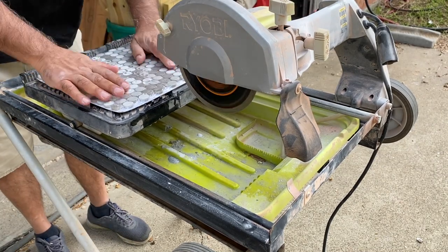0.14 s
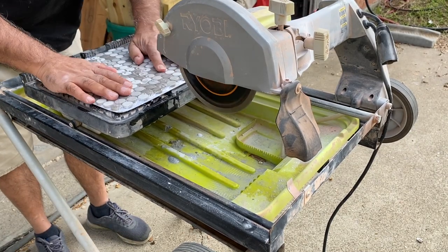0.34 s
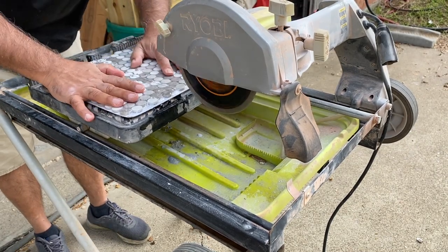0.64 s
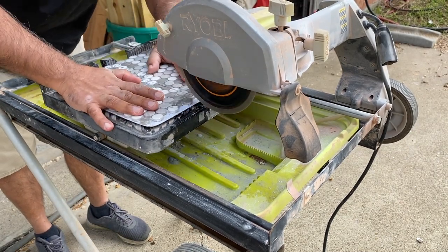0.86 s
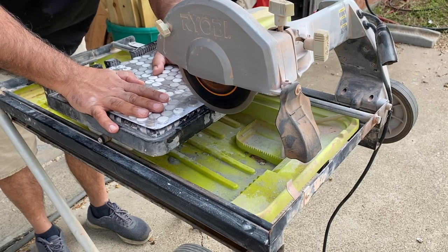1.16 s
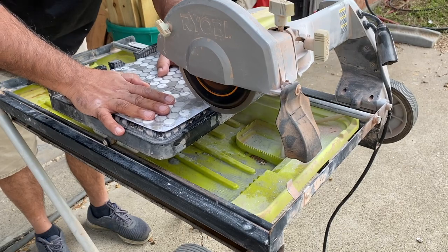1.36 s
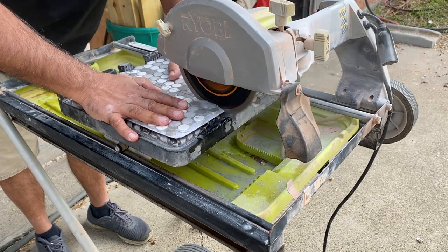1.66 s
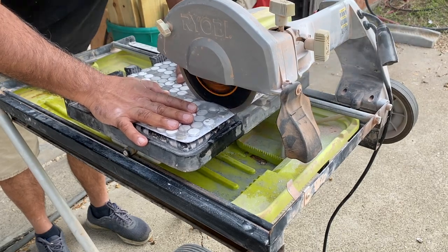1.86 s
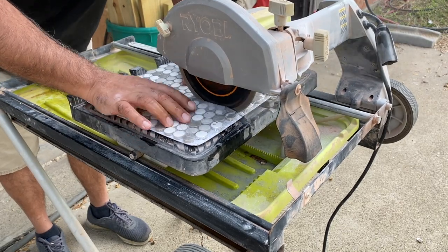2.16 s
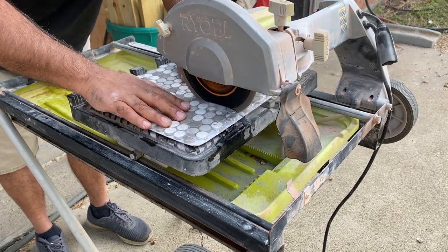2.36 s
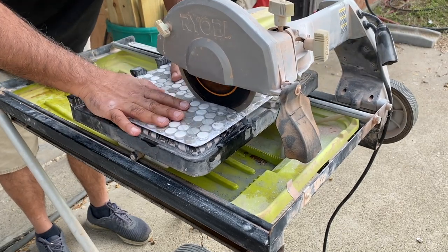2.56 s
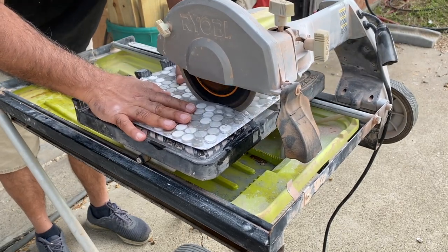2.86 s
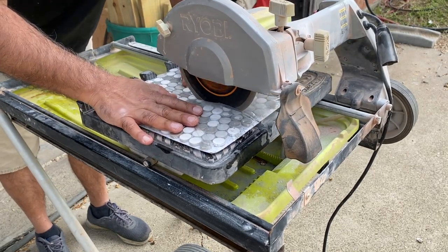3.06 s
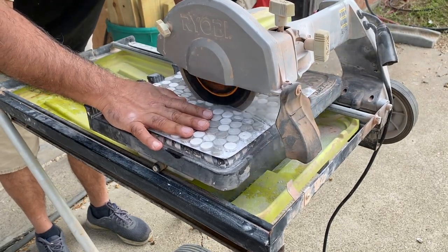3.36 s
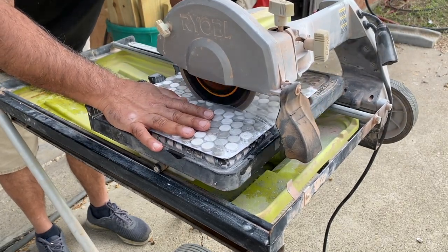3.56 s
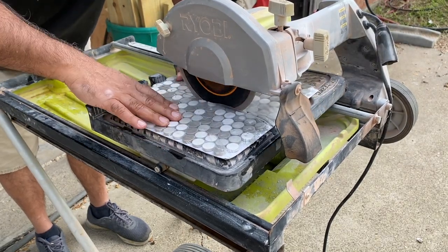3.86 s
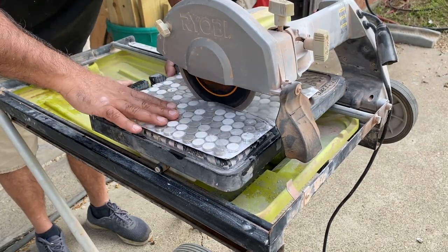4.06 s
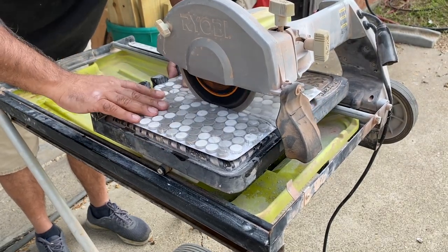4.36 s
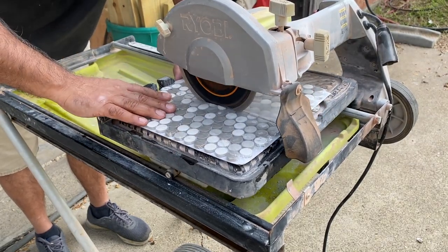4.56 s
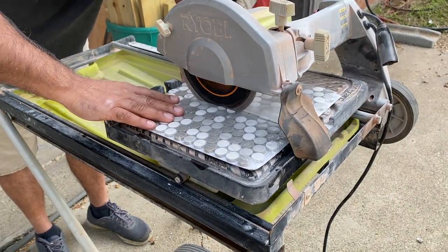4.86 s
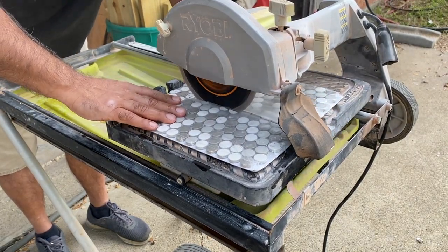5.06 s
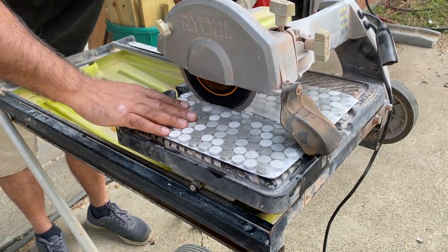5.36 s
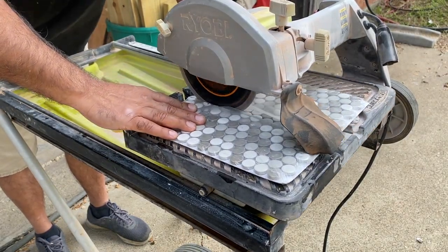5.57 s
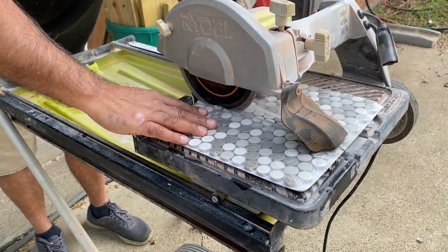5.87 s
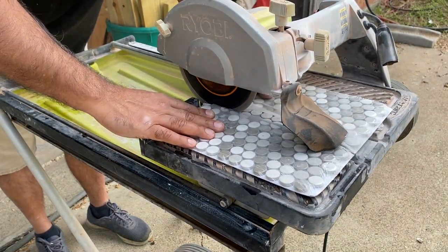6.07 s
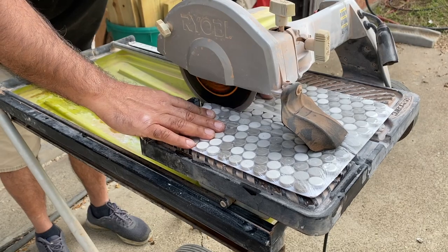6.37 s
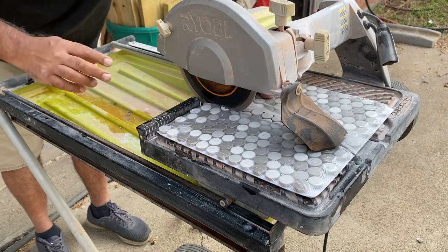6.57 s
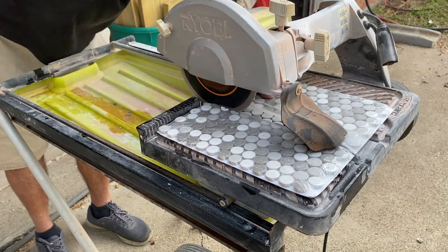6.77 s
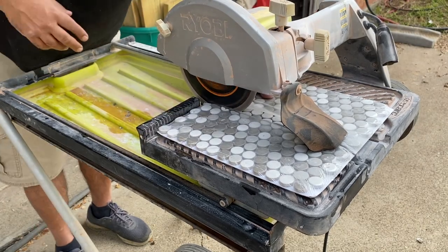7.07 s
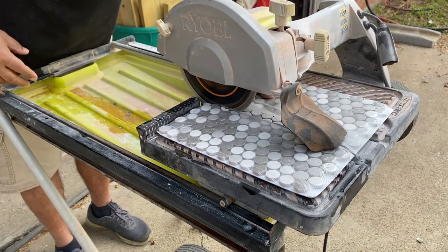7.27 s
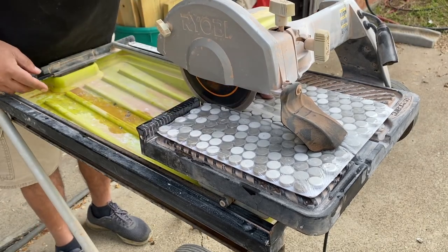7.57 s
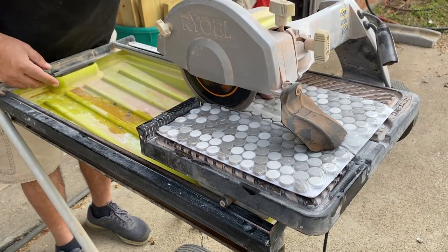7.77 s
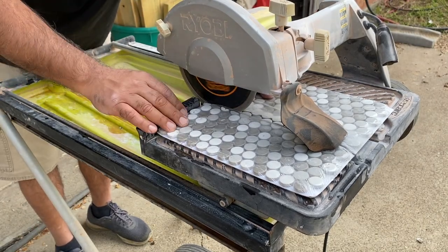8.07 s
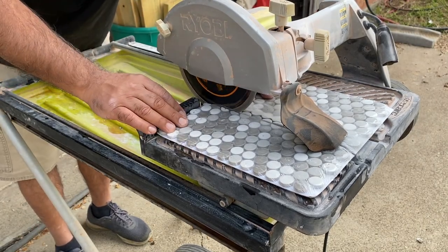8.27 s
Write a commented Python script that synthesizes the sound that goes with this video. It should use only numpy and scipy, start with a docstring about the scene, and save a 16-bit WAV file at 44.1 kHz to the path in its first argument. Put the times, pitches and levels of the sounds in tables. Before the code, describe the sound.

Close, dry stereo sound of a wet tile saw outdoors. From 0 to 1 s it spins free and loud: motor hum and whine rising slightly, rushing air, bright water spray and a ringing blade near 5 kHz. At 1 s the blade bites into mosaic tile with hissing grit and mist. Until about 6 s the grinding swells tile by tile, with short squeals around 1.3-1.8, 2.6-3.3 and 5.3-5.9 s and crushed-grit crunches from 2.6 s. The motor sags deepest near 2 s, recovers, and sags again. The tray rumbles and knocks, notably at 1.3, 2.7 and 4.4 s. After 6 s the cut clears and the whine climbs. Switched off at 6.8 s, the saw coasts down, its falling whine and spray thinning. Faint sliding whistles peak near 8 s; the pump hum continues, and soft low thuds come at 8.4 s.

```python
"""A wet tile saw runs free, grinds through a sheet of small mosaic tiles, is switched off and coasts down.
Grit noise and a pitched rasp make the grinding; driven resonances make the steel blade ring.
Sine waves tied to the rotor make the motor whine, which sags as each tile loads it.
Spray and mist are noise with tiny impacts, flung off the rim and caught by the guard.
The sliding tray rumbles and bumps on its rails, and the water pump hums underneath."""
import sys
import numpy as np
from scipy import signal
from scipy.fft import rfft, irfft, next_fast_len
from scipy.io import wavfile
from scipy.ndimage import map_coordinates

SR = 44100
rng = np.random.default_rng(int(sys.argv[2]) if len(sys.argv) > 2 else 0)


def store_pcm(level_fs):
    """Save levels as 16-bit WAV."""
    pcm = np.round(np.clip(level_fs, -1, 1) * 32767).astype(np.int16)
    wavfile.write(sys.argv[1], SR, np.atleast_2d(pcm).T)


N = 371410
T = np.arange(N) / SR  # time of each sample, s
FULL_SPEED = 383  # reference rotor speed, turns per second
BLADE_GEARING = 6.7  # rotor turns per blade turn

# how far the rim is in the tile: t/s, depth (0-1)
IN_TILE = [(.92, 0), (1.05, .85), (5.95, .88), (6.1, 0.1)]
# how squeals and crunches swell: attack/s, easing/(dB per s), time to fall 60 dB/s
FLARE_SHAPE = (.04, 2, .13)

# Every "..._law" table below holds one part's level:
# level running free/dB, extra during the loud opening/dB, fade of that extra/s,
# change at full load/dB, exponent of the load (no unit), change at standstill/dB


def amp(db):
    """Turn decibels into a gain."""
    return 10 ** (np.asarray(db) / 20)


def unit(x):
    """Scale a signal to rms 1."""
    return x / np.sqrt(np.mean(x ** 2) + 1e-20)


def along(points, hz):
    """Read a table of f/Hz, value on a logarithmic frequency axis."""
    f, value = np.transpose(points)
    return np.interp(np.log(hz + 1), np.log(f + 1), value)


def curves(rows):
    """Draw straight lines through a timed table: one curve per column after the time."""
    s, *columns = np.transpose(rows)
    return [np.interp(T, s, column) for column in columns]


def wobble(rate):
    """A smooth random curve with this many random points a second."""
    knots = rng.standard_normal(int(N * rate / SR) + 4)
    coarse = np.arange(0, N + 16, 16)  # a smooth curve needs only every 16th sample
    smooth = map_coordinates(knots, [coarse * rate / SR])
    return np.interp(np.arange(N), coarse, smooth)


def filtered(x, response):
    """Multiply the spectrum of x by a response that depends on frequency."""
    padded = next_fast_len(N + 8192)
    spectrum = rfft(x, padded) * response(np.fft.rfftfreq(padded, 1 / SR))
    return irfft(spectrum, padded)[..., :N]


def shaped(x, spectrum):
    """Filter x by a table of f/Hz, gain/dB."""
    return filtered(x, lambda hz: amp(along(spectrum, hz)))


def coloured(x, spectrum):
    """Shape x by a spectrum and scale it to rms 1."""
    return unit(shaped(x, spectrum))


def white():
    """Two unrelated noises."""
    return rng.standard_normal((2, N))


def grains(per_second, share):
    """Two noises, a share of whose power comes as separate tiny impacts."""
    share = np.clip(share, 0, 1)
    smooth = white()
    impacts = unit(white() * (rng.random(N) < per_second / SR))
    return np.sqrt(1 - share) * smooth + np.sqrt(share) * impacts


def spread(pair, spectrum=((1, 0), (SR, 0)), wider_db=0):
    """Turn two unrelated signals into one coloured stereo sound whose middle has rms 1."""
    # stereo width: f/Hz, side level relative to the middle/dB
    width = [(40, -9), (120, -15), (400, -16), (1300, -24), (2800, -17), (5000, -19), (8500, -5.5)]

    def response(hz):
        mid_db = along(spectrum, hz)
        return amp([mid_db, mid_db + along(width, hz) + wider_db])

    mid, side = filtered(pair, response)
    return np.array([mid + side, mid - side]) / np.std(mid)


def lean(x, left_db):
    """Make the left channel louder than the right by this many dB."""
    return x * amp([[left_db / 2], [-left_db / 2]])


def angle(hz):
    """Running phase of a moving frequency, in radians."""
    return 2 * np.pi * np.cumsum(hz) / SR


def ringing(hz, width_hz):
    """A resonance driven by noise that follows a moving frequency, rms 1."""
    pole = np.exp(-np.pi * abs(width_hz) / SR)
    a, b = signal.lfilter([1], [1, -pole], white())  # slow random swings of the ring
    phase = angle(hz)
    return unit(a * np.cos(phase) + b * np.sin(phase))


def partials(turn, orders, waver_db, slip):
    """Sines at multiples of a shaft angle, wavering in level and phase (slip in radians)."""
    total = 0
    for multiple, db in orders:
        gain = amp(db + waver_db * wobble(14))
        start = 2 * np.pi * rng.random()
        total = total + gain * np.sin(multiple * turn + start + slip * wobble(45))
    return total


def level(law, state, events=0):
    """dB of one part: it follows the load and the run-down, and its events add their power."""
    free_db, open_db, fade_s, load_db, exponent, stopped_db = law
    load, slowed = state
    # the loud opening dies down from 1.04 s
    opening = np.exp(-np.maximum(T - 1.04, 0) / fade_s)
    steady = amp(free_db + open_db * opening + load_db * load ** abs(exponent) + stopped_db * slowed)
    return 10 * np.log10(steady ** 2 + events)


def swells(rows, shape):
    """Power of events (start/s, length/s, level/dB) that rise, ease off and die away."""
    attack_s, ease_db, t60 = shape
    power = np.zeros(N + SR)
    age = np.arange(SR) / SR
    for start, length, db in rows:
        easing_db = ease_db * np.minimum(age, length)
        release_db = 60 * np.maximum(age - length, 0) / t60
        gain = np.minimum(age / attack_s, 1) * amp(db - easing_db - release_db)
        power[round(start * SR):][:SR] += gain ** 2
    return power[:N]


def pump(state):
    """The small water pump hums at its own steady speed, as a few wavering sines."""
    pump_law = (-70, 9.5, .2, -20, .7, 3)
    # hum tones: f/Hz, level/dB
    tones = [(265, -2.5), (306.8, -14.5), (393, -3), (530, -13)]
    gain = np.sqrt(2) * amp(level(pump_law, state))
    return gain * sum(amp(db + wobble(10)) * np.sin(2 * np.pi * hz * T + 0.32 * wobble(12)) for hz, db in tones)


def tray(state):
    """The tray's rollers judder over gritty rails and now and then bump: noise in low bands."""
    tray_law = (-74, 12, .3, -14, 1, -5)
    # shoves of the tray: start/s, length/s, level/dB
    shoves = [(1.04, .35, -54), (1.43, .16, -63), (1.68, .25, -68), (2.6, .22, -59.5), (2.84, .42, -68),
              (3.95, .35, -64), (4.35, .13, -52), (4.5, .22, -63), (5.35, .55, -70), (6.2, .65, -69),
              (8.35, .07, -62)]
    # how a shove swells: attack/s, easing/(dB per s), time to fall 60 dB/s
    shove_shape = (.1, 2, .15)
    # sound of the rolling: f/Hz, level/dB per Hz
    rolling_spectrum = [(25, -36), (70, -31), (190, 6), (500, 5), (1100, -3), (8000, -52)]
    # bumps and rattles on the rails: t/s, level/dB
    knocks = [(1.268, -46), (1.296, -43), (1.348, -41), (1.363, -39), (1.392, -46), (1.462, -58),
              (1.53, -52), (1.593, -55), (2.652, -53), (2.676, -48), (2.728, -48), (2.773, -54),
              (2.797, -48), (2.88, -56), (2.92, -56), (3.006, -55), (4.378, -46), (4.403, -34.5),
              (4.435, -38), (4.454, -39.5), (4.482, -47), (4.517, -47), (4.625, -53), (5.399, -60),
              (5.936, -59), (6.6, -62)]
    # sound of the bumps: f/Hz, level/dB per Hz
    rumble = [(30, -36), (100, -19), (180, 3), (450, 7.5), (700, 3), (1500, 0), (8000, -38)]
    rolling_db = level(tray_law, state, swells(shoves, shove_shape))
    rolling = amp(rolling_db + 1.8 * wobble(28)) * spread(grains(220, share=.35), rolling_spectrum)
    # each bump starts 3 ms before its peak, then falls 60 dB in 0.04 s
    bump_gain = sum(amp(db - 60 * abs(T - s) / 0.04) * (T > s - .003) for s, db in knocks)
    return rolling + bump_gain * spread(white(), rumble)


def thuds(ring_hz=275, t60=.06):
    """The hand takes hold of the tray: soft blows wake only its lowest ring, a fading sine."""
    # blows: t/s, peak level/dB
    blows = [(8.385, -45), (8.403, -43), (8.414, -44)]
    ages = [(np.maximum(T - s, 0), db) for s, db in blows]
    return sum(amp(db - 60 * age / t60) * np.sin(2 * np.pi * ring_hz * age) for age, db in ages)


def rotor():
    """Rotor speed, load (1 = heavy cut) and share of the speed lost after switch-off."""
    # motor under power, sagging where the cut is heavy: t/s, speed/(turns per second)
    powered_speed = [(0, 370), (.32, 391), (1.01, 393), (1.29, 374), (1.41, 359), (1.5, 355), (1.6, 338),
                     (1.68, 336), (1.75, 327), (1.87, 330), (1.96, 319), (2.1, 343), (2.55, 379),
                     (2.92, 365), (3.06, 351), (3.45, 345), (3.67, 372), (4.02, 383), (4.38, 377),
                     (4.53, 360), (4.85, 349), (5.2, 363), (5.47, 334), (5.62, 341), (5.99, 343),
                     (6.2, 370), (6.6, 384)]
    off_s, coast_s = 6.835, 1.5  # switch-off time; time constant of the drag
    friction = 155  # dry friction, turns per second
    full_load_sag = 50  # turns per second lost in a heavy cut
    spin_lag_s = .1  # the rotor's inertia: its speed follows the load this much later
    powered, = curves(powered_speed)
    speed = (powered + friction) * np.exp(-np.maximum(T - off_s, 0) / coast_s) - friction
    sag = np.maximum(FULL_SPEED - np.interp(T + spin_lag_s, T, powered), 0)
    return speed, sag / full_load_sag, 1 - speed / powered


def dips():
    """dB by which spray, air and motor overtones dip."""
    # spells of quieter sound: start/s, length/s, change/dB
    spells = [(1.05, .07, -3), (1.41, .66, -6.5), (2.07, .28, -3), (3.15, .33, -1.5), (4.52, .48, -6),
              (5.36, .77, -4.5)]
    total = 0
    for start, length, db in spells:
        inside = np.minimum(T - start, start + length - T)
        total = total + db * np.clip(inside / .025 + .5, 0, 1)  # 25 ms edges
    return total


def motor(speed, turn, state, spray_db):
    """Rotor hum, gear and fan whine as sines through the housing, and cooling air as noise."""
    hum_law = (-65, 23.3, .1, -13, 1, -10)
    overtone_law = (-58, 15.5, .04, -18, 1.2, -48)
    gear_law = (-59.5, 8, .1, -22, .7, -22)
    air_law = (-56.2, 15.2, .035, -10, 1.5, -23)
    # rotor imbalance: multiple of the rotor speed (no unit), level/dB
    low_orders = [(1, -4.5), (2, -11), (3, -3.2)]
    # fan and bearings: multiple of the rotor speed (no unit), level/dB
    high_orders = [(3.89, -14), (4, -15.5), (6, -19), (7, -13.5), (8, -10), (9.77, -10), (11, -9)]
    # the motor housing favours one band: f/Hz, gain/dB
    housing = [(500, -18), (780, -4), (1330, -4.5), (1510, 0), (1750, 0)]
    # sound of the cooling air: f/Hz, level/dB per Hz
    air_spectrum = [(50, -60), (120, -56), (220, -19), (600, -11.5), (1000, -5), (1500, -0.5), (2000, 1),
                    (3000, -23), (6000, -58)]
    air_db = level(air_law, state)
    hum = amp(level(hum_law, state)) * partials(turn, low_orders[:1], waver_db=1, slip=0.07)
    overtone_gain = amp(level(overtone_law, state) + dips())
    hum = hum + overtone_gain * partials(turn, low_orders[1:], waver_db=1.5, slip=0.07)
    hum = shaped(hum, [(150, -35), (230, 0)])  # the housing radiates no deep bass
    # the gears run looser as the rotor coasts
    gear = partials(turn, [(4.9, 0)], waver_db=1.5, slip=.3 + state[1])
    gear = np.sqrt(2) * amp(level(gear_law, state)) * gear
    fan = partials(turn, high_orders, waver_db=2, slip=.35)
    whine = amp((air_db + spray_db) / 2 + 3.8 - 5 * state[0]) * (speed / FULL_SPEED) ** 3 * fan
    air = amp(air_db + dips() - 1.2) * spread(white(), air_spectrum, wider_db=5)
    return hum + shaped(gear + whine, housing) + air


def last_whistles(turn):
    """Late in the run-down a thin whistle slides down and drive ripple chirps through a blade mode."""
    level_db, = curves([(7.6, -88), (7.82, -64), (8.0, -55), (8.15, -62), (8.24, -88)])
    # drive ripple: multiples of the rotor speed (no unit)
    ripple_orders = [38, 42, 46, 56, 78]
    whistle = np.sin(106 * turn + .8 * wobble(300))
    ripple = sum(np.sin(k * turn + .6 * wobble(260)) for k in ripple_orders)
    # the mode picks out each ripple as it slides past
    chirps = shaped(ripple, [(4700, -50), (5230, 0), (5700, -12), (7500, -45)])
    return amp(level_db + 1.5) * whistle + amp(-45) * chirps


def cut(state):
    """Every bite raises the grinding, throws mist and rings the blade: three levels in dB."""
    grind_law = (-48, 14.5, .1, -8, 1, -15.5)
    mist_law = (-49.3, 18, .2, -12, .6, -8.5)
    ring_law = (-47, 12, .15, -2, 1, -6)
    # one small tile after another: start/s, length/s, grinding level/dB,
    # mist over grinding/dB, blade ring over grinding/dB (before a small lift)
    bites = [(1.0, 0.31, -37, 4.5, 3.5), (1.37, 0.17, -41, -1, -1), (1.59, 0.15, -43, -3, 2),
             (1.74, 0.23, -46, 0, 4), (2.0, 0.22, -48.5, 0, 6), (2.33, 0.22, -49, 5, 6),
             (2.54, 0.27, -42, 3, 4), (2.84, 0.2, -37.5, -4, 3), (3.11, 0.22, -40.5, -1, 3),
             (3.34, .09, -44, 3, -3), (3.63, 0.17, -43.5, 1, 1), (3.99, 0.24, -42, -1, 1),
             (4.28, 0.22, -37.5, 2.5, 1.5), (4.53, 0.24, -43, -1, 5), (4.8, 0.15, -42, -2, 6),
             (5.04, 0.22, -43.5, -3, 4), (5.27, 0.39, -38, -6, -1), (5.69, 0.24, -41, -3, 2)]
    # how a bite swells: attack/s, easing/(dB per s), time to fall 60 dB/s
    bite_shape = (.11, 5, .7)
    start, length, grind_db, mist_db, ring_db = np.transpose(bites)
    parts = [(grind_law, grind_db), (mist_law, grind_db + mist_db), (ring_law, grind_db + ring_db + .3)]
    return [level(law, state, swells(zip(start, length, db), bite_shape)) for law, db in parts]


def water(spray_db, mist_db):
    """The rim flings drops at the guard and tears them into mist; on the tile they sound lower and splash."""
    # spray in the open: f/Hz, level/dB per Hz
    spray_spectrum = [(700, -57), (1450, -17.5), (1950, -6), (2600, 0.5), (3100, 2), (3550, -9.5),
                      (5200, -18), (14000, -37)]
    # spray and splashes on the tile: f/Hz, level/dB per Hz
    slosh = [(1000, -47), (1550, -11), (2150, 1.5), (3100, -0.5), (4000, -21), (9000, -41)]
    # fine mist: f/Hz, level/dB per Hz
    mist_spectrum = [(5000, -57), (9000, 0), (10500, -0.5), (11700, 2.5), (13200, 3.5), (13800, 3),
                     (14500, -2), (15400, 4.5), (16000, -2)]
    # pooled water caught by the rim: start/s, length/s, level/dB
    splashes = [(1.0, .36, -46), (2.5, .34, -52), (3.66, .22, -49), (4.03, .42, -43.5), (5.0, .19, -47.5)]
    # how a splash swells: attack/s, easing/(dB per s), time to fall 60 dB/s
    splash_shape = (.1, 3, .6)

    def drops(spectrum, wider_db=0):
        return spread(grains(2200, share=0.27), spectrum, wider_db)

    on_tile = np.clip(curves(IN_TILE)[0], 0, 1) * 2 / 3
    # the guard's resonance climbs as tile closes it
    guard_ring = ringing(3080 + 700 * on_tile, width_hz=170)
    guard = amp(-4) * (1 - on_tile) ** 1.8 * spread(guard_ring, [(500, -40), (2500, 0)])
    spray = np.sqrt(1 - on_tile) * drops(spray_spectrum, wider_db=11) + np.sqrt(on_tile) * drops(slosh) + guard
    splash = np.sqrt(swells(splashes, splash_shape)) * drops(slosh)
    spray = amp(wobble(35)) * (amp(spray_db - 0.4) * spray + splash)
    mist = amp(mist_db + 0.6 + wobble(40)) * drops(mist_spectrum)
    return lean(spray, left_db=0.6) + lean(mist, left_db=1.7)


def crunches():
    """The rim digs into a wet edge: a broad band of crushed grit climbs from 3000 to 4000 Hz."""
    # crunches: start/s, length/s, level/dB
    digs = [(2.6, .11, -43.5), (2.91, .12, -47), (3.17, .2, -49), (4.3, .14, -42), (4.56, .17, -47.5),
            (5.2, .14, -49), (5.58, .08, -47), (5.83, .11, -47.5)]
    climb = []
    for start, length, db in digs:
        climb += [(start, 3000), (start + length, 4000)]
    hz, = curves(climb)
    band = spread(ringing(hz, width_hz=1100), [(1000, -30), (2500, 0), (4300, 0), (7000, -20)])
    return np.sqrt(swells(digs, FLARE_SHAPE)) * band


def squeals(turn):
    """The blade locks on to single multiples of the rotor speed, shaken once per blade turn."""
    # squeals: start/s, length/s, level/dB, multiple of the rotor speed (no unit)
    locks = [(1.27, .09, -44, 17), (1.44, .14, -43, 14), (1.44, .12, -48, 23), (1.6, .15, -44, 15),
             (1.62, .12, -50, 25), (1.83, .12, -43, 15), (2.62, .09, -41, 14), (2.93, .12, -43, 14),
             (3.27, .16, -46, 17), (5.33, .2, -42.5, 19), (5.35, .12, -43, 17), (5.54, .41, -48, 14)]
    shake = .6 * np.sin(turn / BLADE_GEARING) + .5 * wobble(130)
    tones = sum(np.sqrt(2 * swells([row], FLARE_SHAPE)) * np.sin(round(k) * turn + shake) for *row, k in locks)
    return lean(tones * amp(2 * wobble(90)), left_db=2.5)  # grit roughens the tones


def rasp(turn):
    """Drive ripple repeats the scrape every rotor turn; blade runout swings it into a rough stack of tones."""
    swung = turn + .045 * np.sin(turn / BLADE_GEARING)
    stack = partials(swung, [(k, 0) for k in range(10, 31)], waver_db=5, slip=.45)
    return stack * (1 + .45 * wobble(260))


def blade(speed, turn, contact, scrape_db, ring_db):
    """Water keeps the main mode singing; tile makes it squeal and wakes modes that rise with the spin."""
    # main mode drifting a little: t/s, f/Hz
    main_mode = [(0, 5175), (1.3, 5200), (4, 5290), (6.8, 5340), (8, 5260)]
    # pitched squeal of the main mode: f/Hz, level/dB per Hz
    squeal_spectrum = [(2000, -50), (4200, -10), (4800, -3), (5250, 5), (5800, -3), (9000, -55)]
    # modes in the cut: f at reference speed/Hz, rise/(Hz per rotor turn a second), width/Hz, level/dB
    cut_modes = [(5325, 2, 30, -6), (7270, 2, 22, -9.5), (9700, 3.5, 40, -8.5), (12880, 4.5, 35, -7),
                 (15480, 3, 200, -12)]
    # mode that sings while the rim runs free: f/Hz, width/Hz, level against the ring level/dB
    free_hz, free_width_hz, free_db = (11520, 50, -17)
    main_hz = curves(main_mode)[0] + 20 * wobble(3)
    pair = np.array([ringing(main_hz, width_hz=102), ringing(main_hz, width_hz=280)])
    sing = spread(pair, [(2500, -14.5), (4800, -7.5), (5800, -3), (10000, -28)])
    # firmer contact turns the singing into a squeal
    pitched = np.clip(.8 * contact ** 2, 0, .55)
    main = amp(ring_db - 1.5) * np.sqrt(1 - pitched) * sing
    main = main + amp(ring_db) * np.sqrt(pitched) * coloured(rasp(turn), squeal_spectrum)
    modes = 0
    for hz, slope, width_hz, db in cut_modes:
        moving_hz = hz + slope * (speed - FULL_SPEED)
        modes = modes + amp(db + 1.6 * wobble(14)) * ringing(moving_hz, width_hz)
    modes = shaped(modes, [(2000, -40), (4600, 5)])
    free_ring = coloured(ringing(np.full(N, free_hz), free_width_hz), [(2000, -40), (9000, 0)])
    main = main + amp(ring_db + free_db) * (1 - contact) ** 4 * free_ring
    return lean(main + amp(scrape_db - 1.0) * np.sqrt(np.abs(contact)) * modes, left_db=2.9)


def grinding(turn, contact, grind_db, spray_db):
    """Diamond grit scrapes the tile; firm contact turns hiss into a pitched rasp."""
    # sound of the scraping: f/Hz, level/dB per Hz
    grind_spectrum = [(2000, -53), (3800, -18), (4700, 0), (6400, 2), (7600, 1), (9300, -2), (10500, -8.5),
                      (14000, -40)]
    # hiss of the slurry: f/Hz, level/dB per Hz
    hiss = [(1500, -63), (2800, -11), (3600, 0.5), (4250, 0.5), (4800, -1.5), (5800, -11.5), (10000, -34)]
    pitched = np.clip(1.05 * contact ** 2, 0, .7)
    scrape = np.sqrt(1 - pitched) * spread(grains(2500, share=0.25), grind_spectrum)
    scrape = scrape + np.sqrt(pitched) * coloured(rasp(turn), grind_spectrum)
    # wet slurry hisses with both the grinding and the flow of water
    slurry_db = 0.74 * grind_db + .5 * spray_db + 9.3 - 1.5 * contact
    slurry = amp(slurry_db) * spread(grains(2000, share=0.16), hiss)
    # the geared-down blade is slightly out of round and bites once per turn
    bite = 1 + 0.11 * contact * np.sin(turn / BLADE_GEARING)
    bite = bite * amp((1.02 + contact) * wobble(35))
    return bite * (amp(grind_db + 0.46) * lean(scrape, left_db=0.1) + lean(slurry, left_db=1.9))


def scene():
    """All parts of the saw, most of them tied to the turning rotor."""
    spray_law = (-46.5, 10.5, .08, -7.5, 1.4, -20.5)
    speed, *state = rotor()  # state: load, share of speed lost
    in_tile, = curves(IN_TILE)
    # the harder the rim presses into the tile, the further the motor sags
    contact = np.clip(in_tile * (.4 + .55 * state[0]), 0, 1)
    turn = angle(speed)
    grind_db, mist_db, ring_db = cut(state)
    spray_db = level(spray_law, state) + dips()
    mix = pump(state) + tray(state) + thuds()
    mix = mix + motor(speed, turn, state, spray_db) + last_whistles(turn)
    mix = mix + water(spray_db, mist_db) + crunches() + squeals(turn)
    mix = mix + blade(speed, turn, contact, (grind_db + mist_db) / 2, ring_db)
    return mix + grinding(turn, contact, grind_db, spray_db)


def record(dry):
    """The microphone loses the deepest bass (below about 70 Hz); nothing is kept from 15850 Hz up."""
    return filtered(dry, lambda hz: (hz < 15850) * hz ** 2 / (hz ** 2 + 70 ** 2))


dry = scene()
out = record(dry)
store_pcm(out)
```